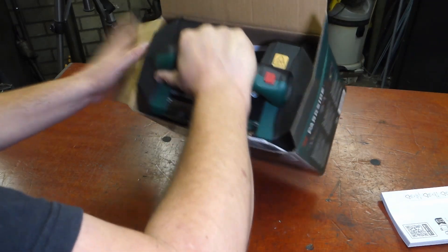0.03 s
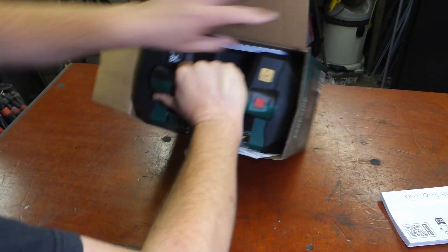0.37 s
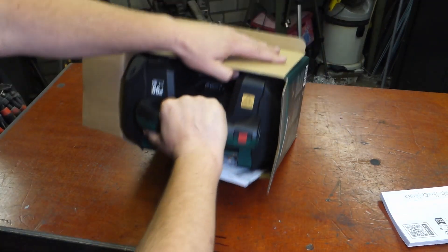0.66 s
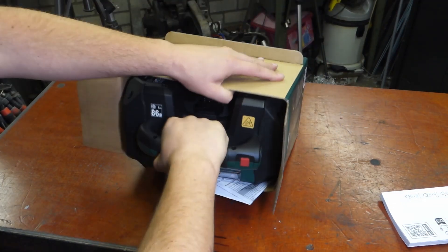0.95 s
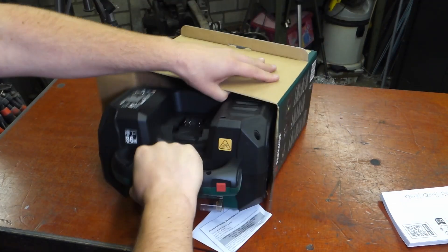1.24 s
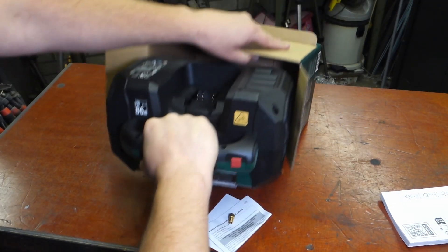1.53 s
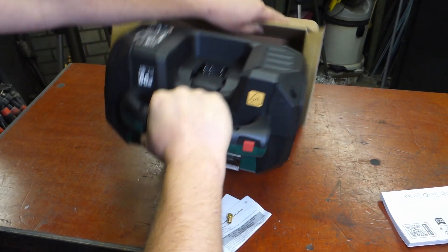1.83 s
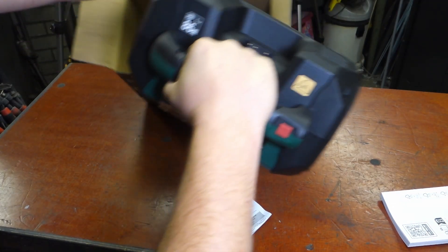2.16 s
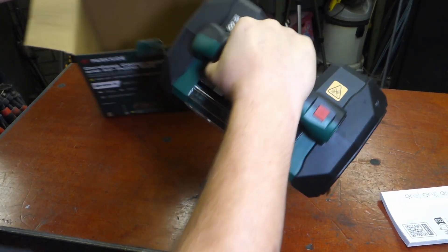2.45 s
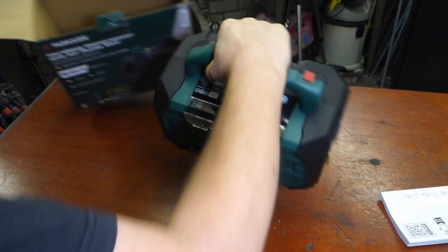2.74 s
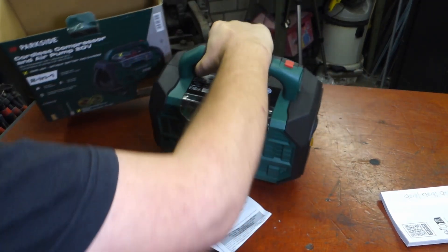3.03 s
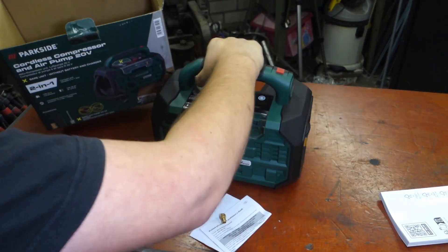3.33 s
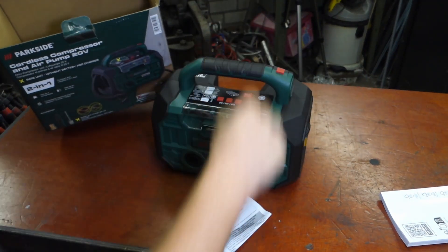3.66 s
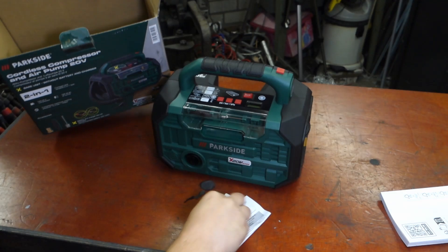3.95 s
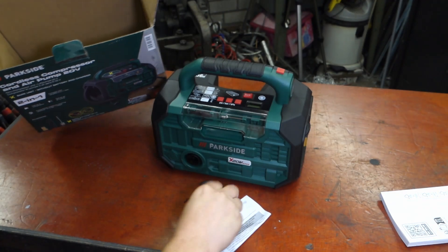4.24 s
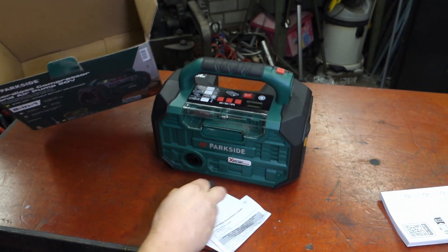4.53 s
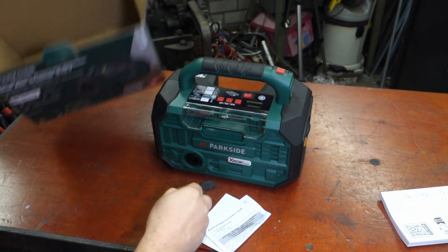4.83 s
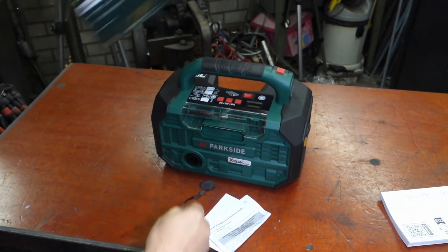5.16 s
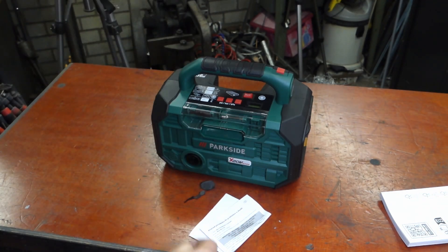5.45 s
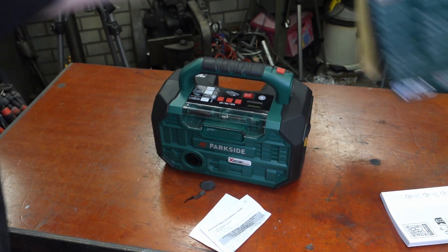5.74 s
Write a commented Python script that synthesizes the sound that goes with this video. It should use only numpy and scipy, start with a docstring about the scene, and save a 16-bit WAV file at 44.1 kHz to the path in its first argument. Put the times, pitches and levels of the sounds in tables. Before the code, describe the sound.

A cardboard box is handled close by, its flaps giving a few hollow slaps and short swipes in the first half second. Light rubbing and small taps follow. At about 1 second a heavy, hard plastic case is tugged out with a rasping scrape and a quick run of booming bumps, the loudest stretch, lasting until about 1.5 seconds, with a low thump from the wooden table. A softer, hissing slide follows from about 1.7 seconds and ends in a hollow knock on the box near 2.4. At 3.2 seconds the case lands on the table with a thud and plastic clack, then rocks once. From about 4 seconds the empty box is slid aside with quiet brushing, swelling slightly after 5.2 as it is lifted. The small workshop adds a short echo, and a distant fan murmurs faintly throughout.

```python
"""Unboxing a heavy tool

A tool in a hard plastic case is pulled from its cardboard box on a wooden table in a small workshop.
Flaps slap open, the case scrapes and bumps its way out and is set down, then the empty box is slid
aside and lifted with a soft brushing. Knocks make box, case and table ring; rubbing fibres catch and
slip, which makes the cardboard drone, rasp and hiss. A fan murmurs far off."""
import sys
import numpy as np
from scipy import signal
from scipy.fft import rfft, irfft
from scipy.io import wavfile

SR = 44100
rng = np.random.default_rng(int(sys.argv[2]) if len(sys.argv) > 2 else 0)


def transcribe(u):
    """Save the signal u as a 16-bit wav file named by the first command-line argument.

    u: samples, shape (n,) or (channels, n), limited to [-1, 1]; the rate is SR.
    q: integer samples, one column per channel.
    """
    v = np.clip(np.atleast_2d(u).T, -1, 1)
    q = np.round(v * 32767).astype(np.int16)
    wavfile.write(sys.argv[1], SR, q)


N = 255339
RING_TIME = np.arange(SR // 2) / SR  # time in seconds during one ring

# A mode is a tone that an object rings with; its decay is the time it takes to fade by 60 dB.
# modes of the table top: pitch_hz, level_db, decay_s
TABLE_MODES = [(51, -14.5, 0.19), (70.4, -5, 0.123), (87, -5, 0.16), (104.6, -5, .15), (123, -3, 0.091)]
# modes of the cardboard walls: pitch_hz, width_hz, level_db
WALL_MODES = [(679, 12, 17.5), (823.5, 16, 28.5), (1105, 9.4, 1), (1617, 71, -6), (1587, 52, 0),
              (1955, 41.6, -1.5), (2150, 16, -7.5), (2820, 51, -15.5)]


def from_db(db):
    """Turn decibels into a number to multiply by."""
    return 10 ** (np.asarray(db) / 20)


def unit_power(x):
    """Scale a sound to an average power of 1."""
    return x / np.sqrt(np.mean(x ** 2) + 1e-20)


def unit_attack(x):
    """Scale a sound so that its first 25 ms have a power of 1."""
    return x / np.sqrt(np.mean(x[:SR // 40] ** 2) + 1e-20)


def at_hz(points, hz):
    """Read between the rows of a table, giving each octave equal room."""
    pitches, values = np.transpose(points)
    return np.interp(np.log(np.maximum(hz, 1)), np.log(pitches), values)


def colour(x, spectrum, size=4096):
    """Turn each pitch up or down as a table of pitch_hz, level_db says."""
    gains = from_db(at_hz(spectrum, np.fft.rfftfreq(size, 1 / SR)))
    cepstrum = irfft(np.log(gains))
    # folding this in half keeps the filter from ringing before the sound arrives
    cepstrum[1:size // 2] *= 2
    cepstrum[size // 2 + 1:] = 0
    response = irfft(np.exp(rfft(cepstrum)))[:size // 2]
    return signal.oaconvolve(x, response)[:len(x)]


def drift(turns_per_s):
    """A random curve that wanders around zero."""
    position = np.arange(N) / SR * turns_per_s
    return np.interp(position, np.arange(N // 20), rng.standard_normal(N // 20))


def resonate(x, modes):
    """Let a sound ring several modes at once, every second one upside down."""
    out = 0
    for k, (hz, width_hz, db) in enumerate(modes):
        r = np.exp(-np.pi * width_hz / SR)
        feed = [(1 - r * r) / 2, 0, (r * r - 1) / 2]
        feedback = [1, -2 * r * np.cos(2 * np.pi * hz / SR), r * r]
        out = out + (-1) ** k * from_db(db) * signal.lfilter(feed, feedback, x)
    return out


def moving_resonance(x, hz, width_hz):
    """A mode whose pitch glides: shift the sound down, keep the lows, shift it back up."""
    turn = np.exp(2j * np.pi * np.cumsum(hz) / SR)
    return (turn * signal.lfilter([1], [1, -np.exp(-np.pi * width_hz / SR)], x / turn)).real


def dying_noise(decay_s):
    """Countless modes fading together sound like fading noise."""
    return rng.standard_normal(len(RING_TIME)) * from_db(-60 * RING_TIME / decay_s)


def ring(modes, scatter_db, detune):
    """A struck object rings; level and pitch vary by chance, as with the spot hit and the grip."""
    hz, db, decay_s = np.transpose(modes)[:, :, None]
    pitch_luck, level_luck = rng.standard_normal((2, len(modes), 1))
    sign = (-1) ** np.arange(len(modes))[:, None]
    waves = sign * np.sin(2 * np.pi * hz * (1 + detune * pitch_luck) * RING_TIME)
    fades = from_db(db + scatter_db * level_luck - 60 * RING_TIME / decay_s)
    return unit_attack(np.sum(waves * fades, 0))


def widen(mid, side, width):
    """Make left and right: mid is what both ears share, side is what sets them apart."""
    side = colour(side, width)
    return np.array([mid + side, mid - side])


def fan(air_db, whirr_db):
    """A far-off fan: steady rushing air and a few tones ringing in its duct."""
    # the rush of air: pitch_hz, level_db
    air_colour = [(25, -6.5), (55, -3.5), (150, -0.5), (260, -7.5), (520, -13.5), (800, -15), (1400, -17),
                  (2150, -19), (2500, -19), (4000, -24.5), (11000, -26.5), (15500, -23)]
    # modes of the duct: pitch_hz, width_hz, level_db
    duct_modes = [(654, 18.8, 2), (933, 30.5, 1.5), (1184, 91.4, 0), (1635, 100, 0.5), (1910, 354, -1.1),
                  (2200, 156, 0.3)]
    air, whirr = rng.standard_normal((2, N))
    air = from_db(air_db) * unit_power(colour(air, air_colour))
    return air + from_db(whirr_db) * unit_power(resonate(whirr, duct_modes))


def workshop(x, echo_db, build_s):
    """A cluttered room adds a short wash of echoes that builds up, then fades band by band."""
    # how long the room rings: pitch_hz, decay_s
    room_decay = [(100, 0.39), (500, 0.3), (1500, 0.32), (4000, 0.53), (12000, 0.37)]
    tail, edges_hz = 0, np.geomspace(50, 17000, num=8)
    for low, high in zip(edges_hz, edges_hz[1:]):
        band = signal.butter(2, [low, high], "band", fs=SR, output="sos")
        tail = tail + signal.sosfilt(band, dying_noise(at_hz(room_decay, np.sqrt(low * high))))
    tail = tail * (1 - np.exp(-(RING_TIME / build_s) ** 2))
    return x + from_db(echo_db) * signal.oaconvolve(x, tail / np.linalg.norm(tail))[:N]


def table_thumps():
    """The table top rings low when weight comes down on it."""
    # weight landing: start_s, level_db
    thumps = [(1.267, -23.5), (1.309, -36), (2.371, -30.5), (3.197, -45), (3.333, -30)]
    out = np.zeros((2, N + SR))
    for start_s, db in thumps:
        thump = from_db(db) * ring(TABLE_MODES, scatter_db=3.5, detune=.02)
        out[0, round(start_s * SR):][:len(thump)] += thump
    return out[:, :N]


def friction(slips_per_s, smooth, judder_db):
    """Fibres catch and let go: tiny random clicks on a smooth rub, with a shaky level."""
    slips = unit_power(rng.choice([-1, 1], N) * (rng.random(N) < slips_per_s / SR))
    return (slips + smooth * rng.standard_normal(N)) * from_db(judder_db * drift(90))


def strokes(rows):
    """Quick rubs that swell, hold and fade; longer ones swell and fade more slowly."""
    t, rubs = np.arange(N) / SR, []
    for start_s, length_s, db, drone_db, hiss_db, edge_hz in rows:
        swell_s, fade_s = 0.0023 + 0.74 * length_s, 0.024 + 0.21 * length_s  # time per 20 dB
        early = np.maximum(start_s - t, 0) / swell_s
        late = np.maximum(t - start_s - length_s, 0) / fade_s
        rubs.append((db - 20 * (early + late), drone_db, hiss_db, edge_hz))
    return rubs


def slide(effort, level_db, drone_db, hiss_db, edge_hz, rise_hz_per_s):
    """A slow rub whose level follows the effort; the pinched edge rises in pitch as it shortens."""
    t = np.arange(N) / SR
    times_s, db = np.transpose(effort)
    db = np.interp(t, times_s, db, left=-np.inf, right=-np.inf)
    return level_db + db, drone_db, hiss_db, edge_hz + rise_hz_per_s * (t - times_s[0])


def add_rubs(rubs):
    """Add rubs into the strength of drone, rasp and hiss; louder rubs count more for the edge pitch."""
    drone, rasp, hiss, pitch = 0, 0, 0, 0
    for db, drone_db, hiss_db, edge_hz in rubs:
        power = from_db(np.maximum(db, -200)) ** 2
        drone += power * from_db(drone_db) ** 2
        rasp += power
        hiss += power * from_db(hiss_db) ** 2
        pitch += power * edge_hz
    return np.sqrt(drone), np.sqrt(rasp), np.sqrt(hiss), pitch / rasp


def scraping(rubs, drone_colour, face_modes, drone_db, panel_db, rasp_db, face_db, pinch_db,
             hiss_db, fibre_db, bright_db):
    """Sliding makes cardboard panels drone, their faces and a pinched edge rasp, and fibres hiss."""
    # modes of the panels: pitch_hz, width_hz, level_db
    panel_modes = [(231, 23, 10.5), (303.7, 55, 11.5), (298, 31, -2), (352, 18, 2.5), (430, 122, -0.5),
                   (540, 15, -3.5), (829, 40, 3.5), (860, 510, -4)]
    # rasp of the faces: pitch_hz, level_db
    rasp_colour = [(400, -9.5), (900, -13.5), (1350, -1.5), (1800, -1), (2600, -2.5), (3300, -7),
                   (4300, -16), (7000, -23.5)]
    # hiss of the fibres: pitch_hz, level_db
    hiss_colour = [(2500, 7.5), (5000, -4.5), (7000, 3.5), (8000, 6.5), (9000, 8), (10000, 5), (11000, 4),
                   (12500, 6), (15500, 3.5)]
    # broad, high modes of the rubbing fibres: pitch_hz, width_hz, level_db
    fibre_modes = [(7300, 980, 1), (7450, 170, -26), (8530, 150, -6), (9300, 530, 14.5), (10900, 400, 1),
                   (13300, 1500, 0)]
    drone, rasp, hiss, edge_hz = add_rubs(rubs)
    build_s, jerk_db, jerks_per_s = 0.012, 3, 55
    lag = np.exp(-1 / (build_s * SR))
    drone = signal.lfilter([1 - lag], [1, -lag], drone)  # the heavy panels start late
    drone *= from_db(jerk_db * drift(jerks_per_s))  # they catch and slip unevenly
    pinch_hz = edge_hz * (1 + .025 * drift(30))  # unsteady pressure bends the pitch
    # a light touch brightens the hiss by bright_db per octave
    hiss_colour = [(hz, db + bright_db * np.log2(hz)) for hz, db in hiss_colour]
    out = np.zeros((2, N))
    for part in out:  # mid, then side
        coarse = friction(slips_per_s=700, smooth=0.98, judder_db=1.5)
        fine = friction(slips_per_s=1900, smooth=2.0, judder_db=2.5)
        panels = from_db(drone_db) * unit_power(colour(coarse, drone_colour))
        panels += from_db(panel_db) * unit_power(resonate(coarse, panel_modes))
        faces = from_db(rasp_db) * unit_power(colour(coarse, rasp_colour))
        faces += from_db(face_db) * unit_power(resonate(coarse, face_modes))
        # the edge is heavily damped, so it does not whistle
        edge = from_db(pinch_db) * unit_power(moving_resonance(coarse, pinch_hz, width_hz=200))
        fibres = from_db(hiss_db) * unit_power(colour(fine, hiss_colour))
        fibres += from_db(fibre_db) * unit_power(resonate(fine, fibre_modes))
        part += drone * panels + rasp * (faces + edge) + hiss * fibres
    return out


def knocks(rows, modes, clack_colour, wall_modes, body_db, boom_db, boom_decay_s, thump_db,
           clack_db, wall_db, crackle_db, contact_decay_s, snap, give_s):
    """A knock rings the body, the struck panel and the table; a snap and crush make the walls clack."""
    # fine crackle at the contact: pitch_hz, level_db
    crackle_colour = [(1500, -45.5), (3300, -17.5), (5000, 4), (7500, 11.5), (11000, -2.5), (16000, -10.5)]
    out = np.zeros((2, N + SR))
    give = 1 - np.exp(-RING_TIME / give_s)  # the contact yields, so the force builds up
    for start_s, low_db, high_db, boom_hz in rows:
        start = round(start_s * SR)
        span = slice(start, start + len(RING_TIME))
        body = from_db(body_db) * ring(modes, scatter_db=4.5, detune=0.0048)
        boom = from_db(boom_db) * ring([(boom_hz, 0, boom_decay_s)], scatter_db=0, detune=0)
        thump = from_db(thump_db) * ring(TABLE_MODES, scatter_db=6.5, detune=0.015)
        out[0, span] += from_db(low_db) * (body + (boom + thump) * give)  # mid only
        for part in out:
            contact = dying_noise(contact_decay_s) * give
            contact[0] += snap
            clack = from_db(clack_db) * unit_attack(colour(contact, clack_colour))
            walls = from_db(wall_db) * unit_attack(resonate(contact, wall_modes))
            crackle = from_db(crackle_db) * unit_attack(colour(contact, crackle_colour))
            part[span] += from_db(high_db) * (clack + walls + crackle)
    return out[:, :N]


def empty_box_slide():
    """The empty box brushes softly as it is slid aside and lifted."""
    # effort of moving the box: time_s, level_db
    effort = [(3.9, -59), (3.988, -50.5), (4.372, -54.5), (4.552, -51.5), (4.584, -58.5), (5.1, -63.5),
              (5.178, -40), (5.594, -42), (5.79, -50)]
    # brushes on the box: start_s, length_s, rasp_db, drone_above_rasp_db, hiss_above_rasp_db, edge_hz
    brushes = [(3.975, 0.051, -43, -26, -7.5, 3000), (4.09, 0.016, -45, -11, -10, 2850),
               (5.25, 0.088, -43, -6, -10, 1730), (5.465, 0.11, -43, -23, -3, 3400)]
    # drone of the empty box: pitch_hz, level_db
    drone_colour = [(30, 8), (70, 3), (108, 15), (160, -49), (280, 4), (420, 3), (580, 4.5), (750, 4),
                    (950, -6.5), (1400, 14), (3000, -47.5)]
    # modes of its faces: pitch_hz, width_hz, level_db
    face_modes = [(950, 71, 14.5), (1220, 39, 11.5), (1632, 17, -17.5), (1847, 33, 23), (2900, 40, -23.5),
                  (3476, 23, -8.5)]
    lifting = slide(effort, level_db=0, drone_db=-6.5, hiss_db=-10.5, edge_hz=1540, rise_hz_per_s=170)
    return scraping([lifting] + strokes(brushes), drone_colour, face_modes, drone_db=-1.5, panel_db=-16,
                    rasp_db=-4, face_db=-14.5, pinch_db=-14, hiss_db=2, fibre_db=-13, bright_db=3.5)


def box_slaps():
    """Slapping flaps and other blows make the hollow cardboard box ring."""
    # blows on the box: start_s, low_db, high_db, boom_hz
    slaps = [(0.066, -23, -36, 315), (0.164, -9, -51, 421), (0.173, -10.5, -18.5, 214),
             (0.354, -6, -24, 280), (0.78, -28.5, -37, 290), (0.877, -26.5, -41, 300),
             (2.372, -9.5, -22.5, 264), (2.469, -26.5, -39, 239), (4.609, -42.5, -67, 234)]
    # modes of the box: pitch_hz, level_db, decay_s
    modes = [(173, -10, 0.46), (214, 2.5, 0.18), (270, 6.5, 0.11), (338, -10.5, 0.21), (395.3, 2, 0.1),
             (526, -5, 0.088), (572, -2, 0.16), (665, 6.5, 0.026), (790, -9, 0.1), (956, -30.5, 0.026),
             (1132, -11, 0.07)]
    # clack of its walls: pitch_hz, level_db
    clack = [(30, -34), (150, -6.5), (300, -2), (800, 2.5), (1500, -2), (2100, -10), (3200, -21),
             (4500, -38.5), (8000, -35.5)]
    return knocks(slaps, modes, clack, WALL_MODES, body_db=-10.5, boom_db=-19, boom_decay_s=0.067,
                  thump_db=-35, clack_db=0, wall_db=-16, crackle_db=-30,
                  contact_decay_s=0.068, snap=13, give_s=0.0007)


def case_scrape():
    """The case rubs along the cardboard in two slow slides, with quick tugs and swipes on top."""
    # effort before and after the main pull: time_s, level_db
    before = [(0.0, -38.5), (0.066, -43), (0.192, -67), (0.434, -37.5), (0.61, -47), (0.762, -42),
              (1.0, -44)]
    after = [(1.45, -36), (1.524, -51.5), (1.774, -47.5), (1.934, -35.5), (2.068, -36), (2.322, -46),
             (2.466, -47), (2.62, -74)]
    # tugs on the case, swipes of flaps and palm:
    # start_s, length_s, rasp_db, drone_above_rasp_db, hiss_above_rasp_db, edge_hz
    tugs = [(0.083, 0.011, -27.5, 2.5, -6, 2800), (0.17, 0.012, -31, 9, -27, 1520),
            (0.29, 0.037, -56.5, 1, 7, 2250), (0.358, 0.025, -38.5, 3, 3, 2470),
            (0.41, 0.049, -47, 8, 0, 2200), (0.484, 0.045, -35.5, -7, -2, 3160),
            (0.6, 0.061, -47.5, 8.5, 4, 1800), (0.7, 0.043, -43.5, -6, 1, 1810),
            (1.03, 0.087, -20.5, -0.5, -8.5, 2560), (1.165, 0.043, -30.5, -3, -14, 1578),
            (1.305, 0.062, -25.5, 1, -11.5, 1500), (1.41, 0.04, -31.5, 12.5, -10, 1400),
            (1.5, 0.045, -52.5, 14, 8.5, 1400), (1.7, 0.15, -42.5, 7.5, -5.5, 1190),
            (1.813, 0.0026, -35.5, 8, 7, 1295), (2.13, 0.086, -31, -19, -2.5, 3450),
            (2.31, 0.091, -40, -12, -1, 2540)]
    # drone of the rubbed box: pitch_hz, level_db
    drone_colour = [(30, -48.5), (55, -9), (90, -5), (140, -5), (230, 4), (300, 13), (460, 4), (650, -1.5),
                    (900, -3), (1400, -19.5), (3000, -49)]
    # modes of its faces: pitch_hz, width_hz, level_db
    face_modes = [(1880, 110, 12), (2240, 88, -9), (2210, 180, -3), (2592, 50, 17.5), (2790, 35, -18),
                  (3180, 120, 6.5), (3374, 60.6, -0.5)]
    easing = slide(before, level_db=1, drone_db=2, hiss_db=-10.5, edge_hz=1700, rise_hz_per_s=950)
    drawing = slide(after, level_db=0.5, drone_db=0, hiss_db=-8, edge_hz=1200, rise_hz_per_s=2500)
    rubs = [easing, drawing] + strokes(tugs)
    return scraping(rubs, drone_colour, face_modes, drone_db=-0.5, panel_db=-6, rasp_db=-3,
                    face_db=-16.5, pinch_db=-11, hiss_db=-0.5, fibre_db=-6, bright_db=0.5)


def case_bumps():
    """The case bumps the box on its way out; the boom rises in pitch as the box empties."""
    # the bumps: start_s, low_db, high_db, boom_hz
    bumps = [(1.087, 0, -17, 275), (1.155, -5.5, -19.5, 283), (1.169, -19.5, -18, 276),
             (1.192, -5, -42, 296), (1.275, 4, -14, 281), (1.297, -0.5, -19.5, 265), (1.328, 3, -38, 291),
             (1.385, -7.5, -15, 304), (1.391, 0, -18.5, 315), (1.397, 4, -11.5, 355),
             (1.427, -10, -20, 378), (1.446, -20, -50, 360), (1.552, -21, -43, 201)]
    # modes of the loaded box: pitch_hz, level_db, decay_s
    modes = [(211, -3.5, 0.12), (271, 0.5, 0.15), (330, 3.5, 0.2), (345, 3.5, 0.22), (456, 7.5, 0.065),
             (510, -15, 0.07), (754, -25.5, .15), (807, -42, 0.21), (977, -12.5, 0.42), (870, -27, 0.13)]
    # clack of the bumped walls: pitch_hz, level_db
    clack = [(30, -48.5), (150, -7.5), (300, 2), (600, -3.5), (1200, -1), (2500, -4), (3100, -11.5),
             (4300, -30), (8000, -37.5)]
    return knocks(bumps, modes, clack, WALL_MODES, body_db=-20.5, boom_db=-9.5, boom_decay_s=0.045,
                  thump_db=-42.5, clack_db=-6, wall_db=-13, crackle_db=-25.5,
                  contact_decay_s=0.028, snap=2.1, give_s=0.004)


def case_landing():
    """The hard plastic case lands and rocks, ringing at each brief hit on the table."""
    # hits on the table: start_s, low_db, high_db, boom_hz
    landings = [(3.197, 3.5, -29, 212.4), (3.206, -7.5, -13.5, 212), (3.223, -7, -18, 214),
                (3.334, -22.5, -27.5, 197)]
    # modes of the whole case: pitch_hz, level_db, decay_s
    modes = [(174, -14.5, 0.14), (216.4, 10.5, 0.25), (283.4, -8, 0.36), (333, -36, 0.1), (401, -1.5, 0.21),
             (494, 0, 0.23), (573, -37, 0.17), (680, -6, 0.093), (1070, -7, 0.2)]
    # clack of the plastic: pitch_hz, level_db
    clack = [(30, -38), (120, -40), (300, 6), (500, -1.5), (800, -8.5), (1400, -4), (1720, -0.5), (1950, 6),
             (2300, 1.5), (2600, -15), (3200, -16), (4200, -40), (8000, -35.5)]
    # modes of the shell: pitch_hz, width_hz, level_db
    shell_modes = [(1015, 35, -12), (1575, 13, 8), (1690, 36, -28), (1864, 150, 13.5), (1904, 36, -4),
                   (2010, 90, -4), (2330, 70, 3.5)]
    return knocks(landings, modes, clack, shell_modes, body_db=-15, boom_db=-23, boom_decay_s=0.14,
                  thump_db=-29, clack_db=-1.5, wall_db=-10, crackle_db=-30,
                  contact_decay_s=0.065, snap=3.2, give_s=0.00062)


def scene():
    """Box, case and table in the room, over the fan; the treble leans to the right."""
    # stereo width of the nearby handling: pitch_hz, side_minus_mid_db
    near_width = [(100, -26), (300, -25), (700, -14), (1300, -11.5), (2400, -11), (4400, -3), (8000, -3.5),
                  (15000, -3)]
    # stereo width of the fan: pitch_hz, side_minus_mid_db
    far_width = [(60, -16), (110, -14), (380, -5), (700, -6), (1300, -2), (4400, 0)]
    # lean of the sound: pitch_hz, left_minus_right_db
    balance = [(2300, 0), (4400, -4), (8000, -3.3), (15000, -4.6)]
    handling = box_slaps() + case_bumps() + case_landing()
    handling += case_scrape() + empty_box_slide() + table_thumps()
    near = [workshop(part, echo_db=-8.5, build_s=0.0089) for part in handling]
    far = [fan(air_db=-54, whirr_db=-53.5) for _ in range(2)]
    left, right = widen(*near, near_width) + widen(*far, far_width)
    left = colour(left, [(hz, db / 2) for hz, db in balance])
    right = colour(right, [(hz, -db / 2) for hz, db in balance])
    return np.array([left, right])


def record(dry, rumble_hz=38, top_hz=16000):
    """The microphone drops the deepest rumble, rounds the tallest peaks and cuts the highest treble."""
    thin = signal.sosfilt(signal.butter(2, rumble_hz, "high", fs=SR, output="sos"), dry)
    rounded = thin / (1 + thin ** 8) ** (1 / 8)
    return signal.sosfilt(signal.ellip(12, .1, 90, top_hz, fs=SR, output="sos"), rounded)


dry = scene()
out = record(dry)
transcribe(out)
```